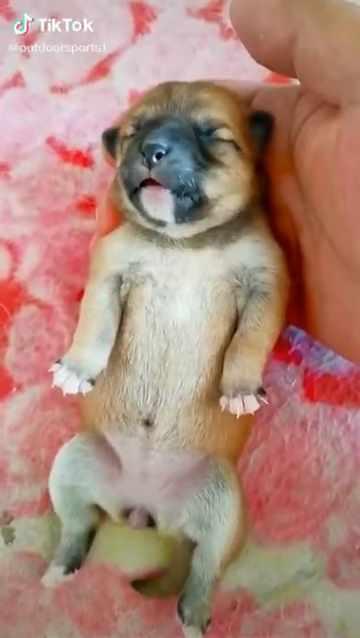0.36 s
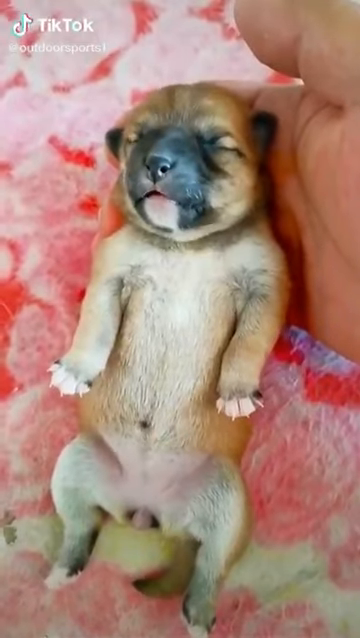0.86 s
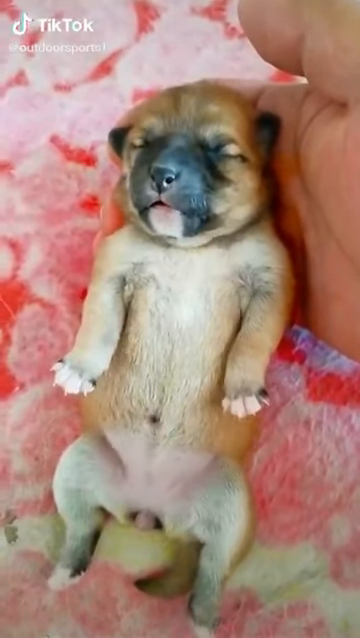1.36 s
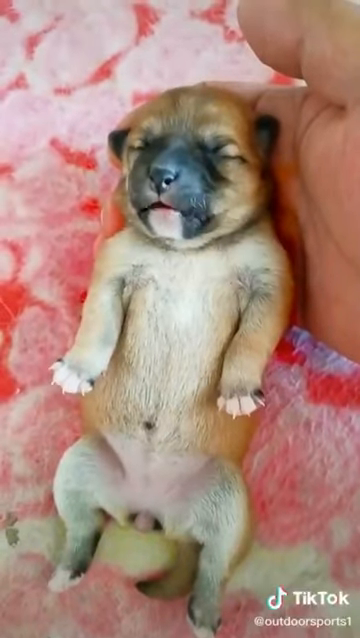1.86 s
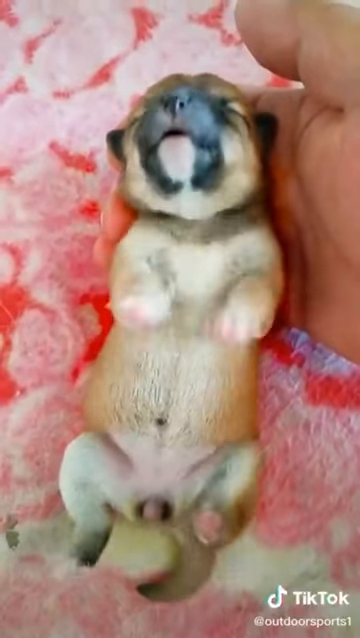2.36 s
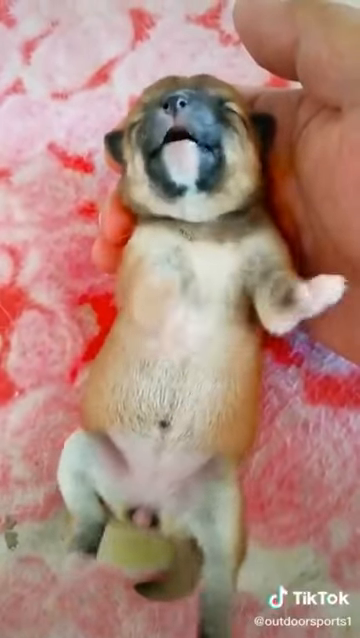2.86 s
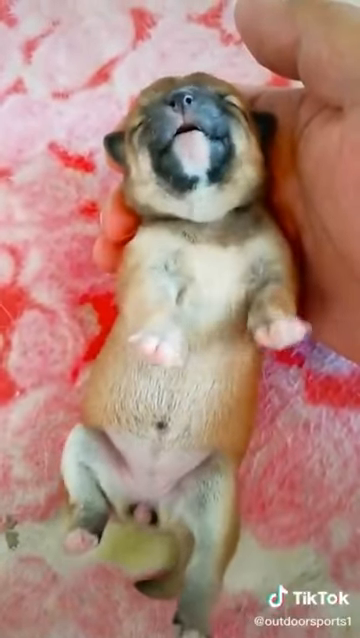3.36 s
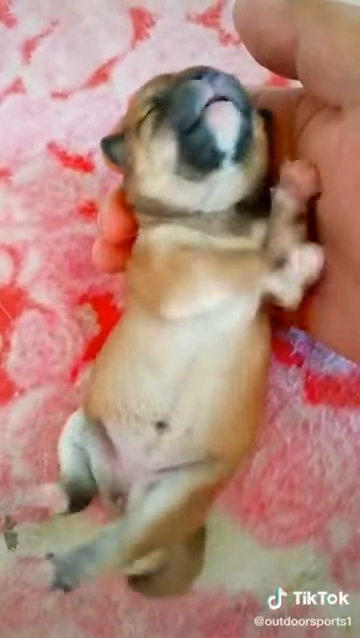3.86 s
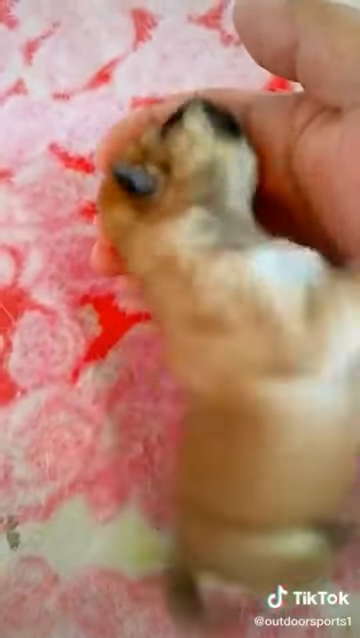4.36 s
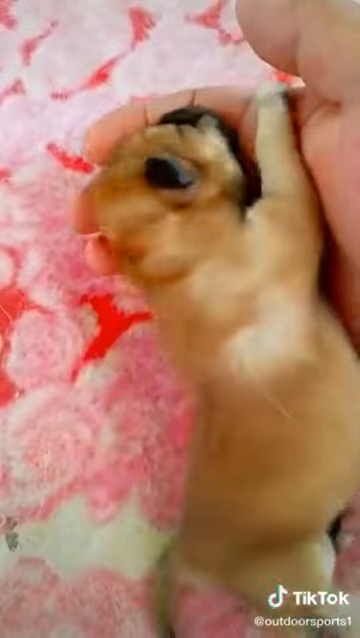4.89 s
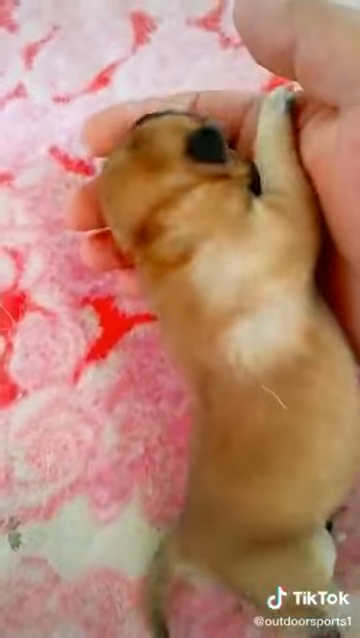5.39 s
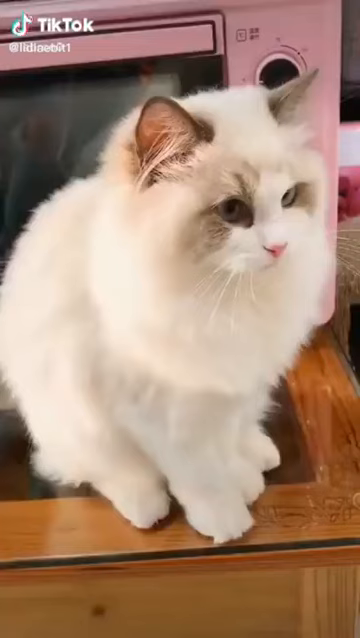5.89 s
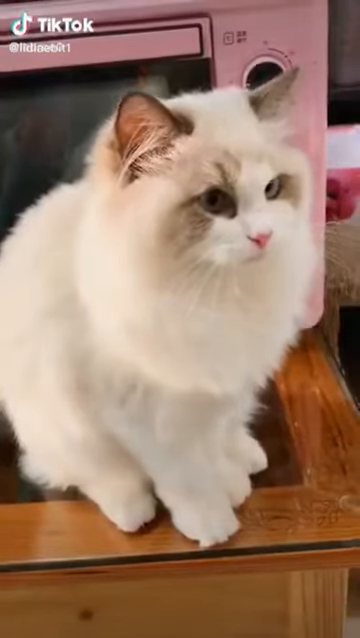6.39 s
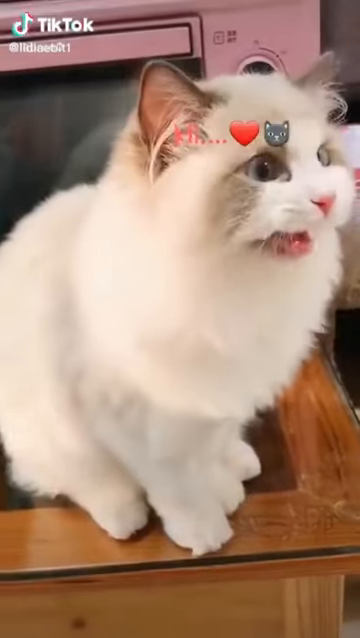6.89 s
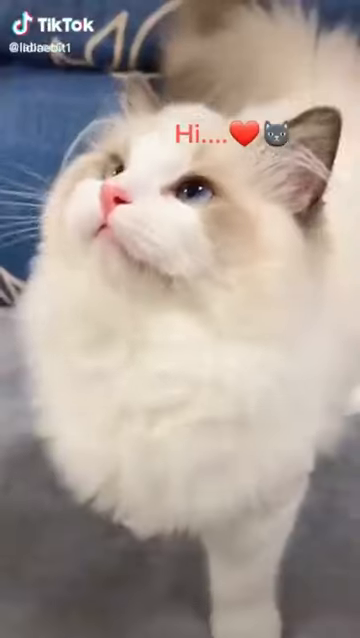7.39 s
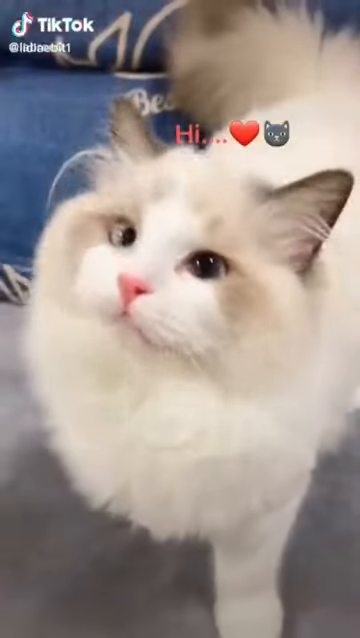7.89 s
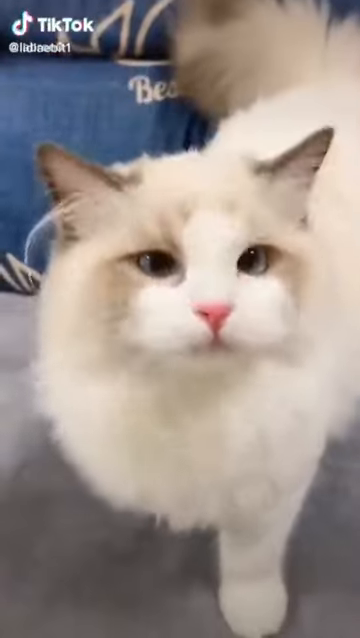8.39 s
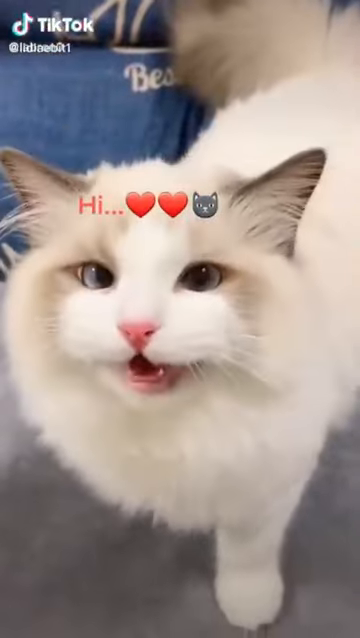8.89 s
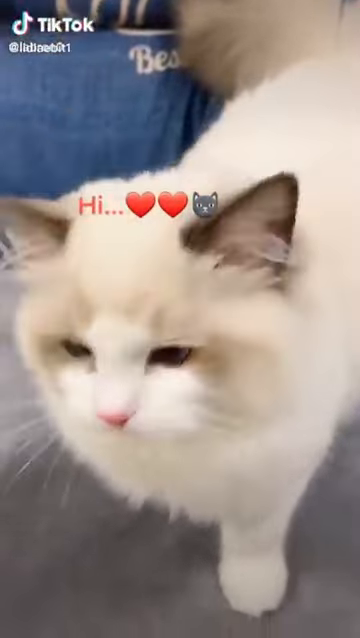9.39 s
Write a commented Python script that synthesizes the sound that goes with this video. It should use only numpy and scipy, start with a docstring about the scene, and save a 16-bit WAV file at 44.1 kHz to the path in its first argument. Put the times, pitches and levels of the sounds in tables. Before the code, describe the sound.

A newborn puppy, close and slightly left in a small, softly echoing bedroom, starts wailing at once: a loud shrill cry leaps upward, cracks, sobs and slides into low creak by 1.0 s, a thin fluttering whistle-like wheeze lingering to 1.3. A wet tick, then the second wail, 1.4-2.5, dips, quavers and climbs to a piercing end. A nasal gasp leads to the third, 2.8-3.8, swooping up then sobbing downward; another gasp, and the fourth, 4.1-4.9, falls similarly. A quieter closed-mouth grumble runs 5.1-5.5. Faint hum, hiss and rustle lie beneath. Complete silence at 5.77-5.91, then low mono room tone. A cat mews softly and thinly at 6.6-7.3, followed by tiny wet ticks and faint throat rattles to 7.8. More rattle at 8.3 precedes a higher, brighter mew at 8.6, roughening and fading into hiss by 9.27. Lip smacks and ticks end it.

```python
"""Newborn puppy, then a cat

A newborn puppy on a blanket wails four times with a quavering voice, then grumbles: harmonics through
throat resonances plus pulsed breath noise, heard from the left at two microphone ports. After a short
silence a cat in another room mews twice in mono: harmonics plus narrow hiss. Noise bursts ringing in
cavities make the throat ticks; decaying sines make the lip smacks; shaped noise makes the room air."""
import sys
import numpy as np
from scipy import signal
from scipy.fft import rfft, irfft, next_fast_len
from scipy.io import wavfile
from scipy.ndimage import map_coordinates

SR = 44100
rng = np.random.default_rng(int(sys.argv[2]) if len(sys.argv) > 2 else 0)


def digitize_waveform(pressure):
    """Quantize a signal to 16-bit integers and store it at the path in sys.argv[1].

    Rows of a 2-D input are taken as channels; values are limited to [-1, 1].
    """
    field = np.atleast_2d(pressure).T
    bounded = np.clip(field, -1, 1)
    quanta = np.round(bounded * 32767).astype(np.int16)
    wavfile.write(sys.argv[1], SR, quanta)


def gain_from_decibels(decibels):
    """Convert decibel values to linear amplitude factors."""
    exponent = np.asarray(decibels, float) / 20
    return 10 ** exponent


N = 418950
T = np.arange(N) / SR


def unit(x):
    """x at rms 1."""
    return x / np.sqrt(np.mean(x ** 2) + 1e-20)


def along(points, hz):
    """(Hz, value) points interpolated on a log frequency axis."""
    f, v = np.transpose(points)
    return np.interp(np.log(hz + 1), np.log(f + 1), v)


def curves(rows, t=T):
    """One value per sample for each column after the time."""
    s, *columns = np.transpose(rows)
    return [np.interp(t, s, column) for column in columns]


def span(rows, fade_s=0.0036):
    """Sample times that a table covers, and a window that softens both ends."""
    t = T[round(rows[0][0] * SR):round(rows[-1][0] * SR)]
    return t, np.clip(np.minimum(t - t[0], t[-1] - t) / fade_s, 0, 1)


def add(track, x, start_s):
    """Mix x into track from start_s."""
    part = track[round(start_s * SR):][:len(x)]
    part += x[:len(part)]


def wobble(rate_hz, size=N):
    """Smooth random curve, rate_hz knots a second."""
    knots = rng.standard_normal(int(size * rate_hz / SR) + 4)
    return map_coordinates(knots, [np.arange(size) * rate_hz / SR])


def filtered(x, response):
    """x times a complex response of frequency."""
    size = x.shape[-1]
    m = next_fast_len(size + 8192)
    return irfft(rfft(x, m) * response(np.fft.rfftfreq(m, 1 / SR)), m)[..., :size]


def noise(spectrum, size=N):
    """Noise of rms 1 coloured by (Hz, dB) points."""
    return unit(filtered(rng.standard_normal(size), lambda hz: gain_from_decibels(along(spectrum, hz))))


def tract(modes, f):
    """Complex response of parallel resonances of alternating sign: (centre Hz, width Hz, dB)."""
    return sum((-1) ** k * gain_from_decibels(db) * 1j * f * width / (centre ** 2 - f * f + 1j * f * width)
               for k, (centre, width, db) in enumerate(modes))


def voice(hz, tilt_db, modes, mouth, jitter, shimmer_db, patchy_db, blur, count, odd=1, treble_db=0,
          edge_hz=3000):
    """Harmonics weighed by the throat at their frequency, each wavering alone; also the phase in cycles."""
    size = len(hz)
    phase = np.cumsum(hz * (1 + jitter * wobble(250, size))) / SR
    grid_hz = np.arange(0, SR / 2)
    response = tract(modes, grid_hz) ** 2 * (grid_hz < 16000)  # two passes, deep valleys
    step = np.exp(2j * np.pi * phase)
    turn, tone, power = 1, 0, 1e-12
    knots = np.arange(size) * 30 / SR
    for k in range(1, count + 1):
        turn = turn * step
        partial_hz = k * hz
        waver_db = patchy_db * np.interp(knots, range(60), rng.standard_normal(60))
        throat = response[np.minimum(partial_hz / mouth, SR / 2 - 1).astype(int)]
        gain = throat * gain_from_decibels(tilt_db * np.log2(k) + waver_db)
        gain = gain * gain_from_decibels((treble_db + waver_db) / (1 + (edge_hz / partial_hz) ** 8))
        # high partials fray into noise
        scatter = np.interp(knots * 12, range(720), rng.standard_normal(720))
        gain = gain * np.exp(1j * blur * scatter * np.minimum(partial_hz / 4600, 1.3) ** 3)
        gain = gain * (odd if k % 2 else 1)
        tone = tone + (gain * turn).real
        power = power + abs(gain) ** 2 / 2
    return gain_from_decibels(shimmer_db * wobble(180, size)) * tone / np.sqrt(power), phase


def ticks(events, width_hz, spread_db):
    """Short puffs of noise ringing in a narrow cavity over a broad splash."""
    out, t = np.zeros(N), T[:SR // 10]
    for start_s, peak_db, ring_hz, length_ms in events:
        window = np.sin(np.pi * np.clip(t / (length_ms / 1000), 0, 1)) ** .5
        puff = rng.standard_normal(len(t)) * window
        ring = filtered(puff, lambda f: tract([(ring_hz, width_hz, 0)], f) + gain_from_decibels(spread_db) * (f > 1500))
        add(out, gain_from_decibels(peak_db) * ring / abs(ring).max(), start_s)
    return out


def pup_cries():
    """Gliding harmonic cries; low pitch turns creaky, each sob lowers pitch and level."""
    # one table per cry, before sobs: (time [s], pitch [Hz], level [dB], source tilt [dB/octave])
    cries = [
        [(.006, 567, -17, -4.5), (.06, 1231, -4, 7.5), (.11, 1633, -7.5, 3), (.13, 1165, -12.5, 8),
         (.185, 925.4, -6, -1), (.235, 910, -8.5, -0.5), (.3, 1309, -11, -7), (.36, 1374, -9, -1.5),
         (.445, 818, -10.5, 0), (.555, 592, -14.5, -1), (.6, 416, -12.5, -1.5), (.7, 307.6, -16.5, -2.5),
         (.82, 165, -20.5, -1.5), (.95, 120.5, -31, -1), (1.026, 99.5, -46.5, 0)],
        [(1.398, 262.3, -32, -9.5), (1.43, 525.4, -13, -3), (1.475, 973, -8, 1.5), (1.505, 1070, -8, 1),
         (1.59, 566.8, -10, 1.8), (1.65, 556, -12, -2), (1.76, 777.6, -8, 1.5), (1.83, 697.5, -9.5, 0),
         (2.08, 964, -6.5, -1.6), (2.13, 1148, -12, -2), (2.295, 1342, -5.5, -8), (2.32, 1643, -3, -17),
         (2.43, 1799, -6, -8.5), (2.47, 1460, -11.5, 3.5), (2.495, 854, -11.5, -5.5), (2.522, 656, -29, 2.5)],
        [(2.79, 300, -25.5, 1), (2.83, 671, -10, 4), (2.86, 1190, -4.5, 11.5), (2.925, 1837, -8, 5.5),
         (2.955, 1268, -15, 5), (3.03, 892, -9, 1.5), (3.12, 1107, -7.5, 1.5), (3.33, 1261, -7.5, -3.5),
         (3.39, 1185, -8, 0), (3.5, 803, -8.5, -3.5), (3.54, 624, -13.5, -2.5), (3.65, 578, -11.5, -2),
         (3.69, 419.4, -11.5, -4), (3.78, 317.8, -21.5, -2), (3.834, 129.4, -35.5, -10)],
        [(4.07, 377, -21.5, -3.5), (4.11, 965, -4, 2.5), (4.15, 1367, -7, 9), (4.195, 1646, -8.5, 2),
         (4.255, 1248, -17.5, 2), (4.315, 1015, -12.5, 0), (4.42, 1059, -8, -3), (4.455, 1186, -11, -2.5),
         (4.51, 1054, -8.5, 0), (4.62, 692, -10, -0.5), (4.71, 557, -11.5, 0.5), (4.82, 401.7, -12, -2),
         (4.866, 300, -31.5, -2.5)],
        [(5.088, 166.3, -27, 3.5), (5.125, 217.8, -19.5, 0.5), (5.17, 314, -19.5, 0), (5.215, 328, -15.5, 1.5),
         (5.3, 284, -18.5, -0.1), (5.36, 300.4, -18.5, -1), (5.44, 281.3, -16.5, -0.5), (5.472, 260, -30, 1)],
    ]
    # extra air per cry: [dB]
    hoarseness_db = [3.5, 4, 0, -3, -5]
    # runs of evenly spaced sobs: (first [s], last [s], sobs [count], strength [share])
    sob_runs = [(.082, .228, 4, .6), (.44, .577, 3, .9), (.668, .855, 4, .8), (1.6, 1.667, 2, .8),
                (1.722, 2.04, 6, .95), (2.1, 2.278, 4, 1.2), (3.095, 3.245, 4, 1.1), (3.3, 3.585, 6, .95),
                (3.662, 3.75, 2, 1), (4.21, 4.41, 5, 1.1), (4.48, 4.6, 3, 1), (4.668, 4.745, 2, .5)]
    # throat resonances before the mouth factor: (centre [Hz], width [Hz], level [dB per pass])
    open_throat = [(300, 160, -9.5), (972, 653, -0.5), (1908, 720, 5), (3616, 1500, -0.45), (5960, 680, -3),
                   (6690, 1740, -9.5), (10980, 3900, -19.5)]
    # same columns, mouth nearly shut
    grumble_throat = [(300, 130, -4), (970, 560, -1.5), (2160, 560, 3), (3397, 820, 2.5), (6560, 3100, -10)]
    break_hz, break_octaves = 570, .5  # where the voice breaks
    calm_semitones, break_semitones = .75, 5.5  # sobs go deepest at the break
    sob_s, sob_db_per_semitone = .027, .3  # full width at half depth

    out = np.zeros(N)
    throats = 4 * [open_throat] + [grumble_throat]
    for rows, throat, hoarse_db in zip(cries, throats, hoarseness_db):
        t, fade = span(rows)
        hz, level_db, tilt_db = curves(rows, t)
        octaves = np.log2(hz / break_hz)
        breaking = np.exp(-(octaves / break_octaves) ** 2)
        sobs = sum(share * np.exp(-np.log(2) * abs(2 * (t - s) / sob_s) ** 1.5)
                   for first, last, n, share in sob_runs for s in np.linspace(first, last, round(n)))
        sag_semitones = sobs * (calm_semitones + break_semitones * breaking)
        hz = hz * 2 ** (-sag_semitones / 12)
        creak = np.clip(170 / hz, 0, 1.5) ** 3
        mouth = 0.93 + 0.027 * octaves  # resonance factor
        tone, phase = voice(hz, tilt_db, throat, mouth, jitter=.0035 + .007 * creak,
                            shimmer_db=1.1 + 1.2 * creak, patchy_db=2.2, blur=1.1, count=36,
                            treble_db=-7 + .5 * tilt_db)  # treble needs a strained voice
        # strained, breaking or creaky voice leaks more air
        breath_db = -24.5 + hoarse_db + 0.72 * tilt_db + 7 * breaking
        breath_db = breath_db + 5.5 * np.clip(creak, 0, 1) ** 0.54
        gusts = rng.standard_normal(len(t)) * (1 + 0.97 * np.cos(2 * np.pi * phase))  # once a cycle
        breath = unit(filtered(
            gusts, lambda f: (tract(throat, f) ** 2 + gain_from_decibels(-33 + hoarse_db)) * f / (f + 3500)))
        level = gain_from_decibels(level_db - sob_db_per_semitone * sag_semitones)
        add(out, fade * level * (tone + gain_from_decibels(breath_db) * breath), t[0])
    return out


def pup_wheeze():
    """Thin wheeze as the first cry runs out of air: two whistles and a faint lower tone, fluttering."""
    # (time [s], pitch [Hz], relative level [dB], upper whistle [Hz], upper over main whistle [dB])
    wheeze_rows = [(.7, 1725, -40, 3085, 7), (.8, 1972, -35, 3186, 3.5), (.946, 1854, -34.5, 3440, -2),
                   (1.04, 2210, -23, 3420, -19.5), (1.182, 2225, -43.5, 3770, -30),
                   (1.25, 2390, -35, 3220, -51), (1.32, 2280, -64, 3030, -16)]
    t, fade = span(wheeze_rows, fade_s=0.043)
    size = len(t)
    hz, level_db, upper_hz, upper_db = curves(wheeze_rows, t)
    phase = 2 * np.pi * np.cumsum(hz * (1 + .025 * wobble(300, size))) / SR
    upper = 2 * np.pi * np.cumsum(upper_hz * (1 + .04 * wobble(300, size))) / SR
    partials = np.sin(phase) + gain_from_decibels(upper_db) * np.sin(upper) + gain_from_decibels(-25) * np.sin(.55 * phase)
    flutter = gain_from_decibels(level_db + 6 + 4 * wobble(70, size))
    out = np.zeros(N)
    add(out, fade * flutter * partials, t[0])
    return out


def pup_inbreaths():
    """Air drawn in between cries: nose-coloured noise that swells briefly, then dies away."""
    # (start [s], end [s], highest level [dB])
    inbreaths = [(2.55, 2.791, -38), (3.828, 4.074, -35), (4.881, 5.093, -49)]
    # (frequency [Hz], relative density [dB per Hz])
    nose_spectrum = [(350, -73.5), (600, -22.5), (765, -6), (1000, -24), (1630, -7), (1960, -5.5),
                     (3650, 6), (15000, -21)]
    out = np.zeros(N)
    for start_s, end_s, db in inbreaths:
        rows = [(start_s, db - 2), (start_s + .07, db), (end_s, db - 22.5)]
        t, fade = span(rows, fade_s=0.025)
        add(out, fade * gain_from_decibels(curves(rows, t)[0]) * noise(nose_spectrum, len(t)), t[0])
    return out


def puppy():
    """Cries, inbreaths and wheeze, with wet ticks of tongue and throat."""
    # (time [s], peak [dB], ring [Hz], length [ms])
    pup_ticks = [(1.3885, -26, 1516, 5.4), (2.5844, -26, 1833, 3.3), (3.8933, -24, 3270, 5),
                 (4.9819, -22, 2270, 5)]
    clicks = ticks(pup_ticks, width_hz=2500, spread_db=-18)
    return clicks + pup_cries() + pup_inbreaths() + pup_wheeze()


def cat_mews():
    """Clean thin harmonics with a narrow hiss through the teeth."""
    # one table per mew: (time [s], pitch [Hz], level [dB], overtones [dB], hiss over voice [dB])
    mews = [
        [(6.595, 736, -44, 17, -22), (6.609, 757, -31.5, 6, -33), (6.651, 832, -35, 7, -32),
         (6.761, 846, -38, -0.5, -28), (6.809, 892, -34.5, -6.5, -34), (6.997, 934.4, -33.5, -14.5, -32.5),
         (7.151, 877, -35, -17.5, -21), (7.177, 972, -40, -13, -18.5), (7.27, 924, -55.5, -9.5, -10.5)],
        [(8.61, 964, -38, -3.5, -27), (8.632, 1104, -32, 7.5, -24), (8.716, 1317, -22.5, 15.5, -29.5),
         (8.768, 1320, -22, 17, -24), (8.876, 1166, -35.5, -1.5, -13.5), (8.988, 1072, -43, -6, -5.5),
         (9.068, 1096, -44, -8, 9.5), (9.13, 1085, -42, -6, -6.5), (9.258, 1038, -42.5, -11, -9),
         (9.27, 1122, -32, -18, -17)],
    ]
    # every other pulse of the second mew weakens, so lines appear halfway:
    # (time [s], halfway lines [share], pitch jitter [share])
    doubling = [(8.645, 0, .003), (8.66, .9, .008), (8.84, .8, .008), (8.855, .5, .05), (8.915, .4, .04),
                (8.93, 0, .003)]
    # throat resonances before the mouth factor: (centre [Hz], width [Hz], level [dB per pass])
    cat_throat = [(1020, 590, 0.5), (2444, 1100, 1.4), (4500, 1100, -1), (7140, 1380, -10),
                  (9000, 1140, -6.5), (12600, 4700, -15.5)]
    # (frequency [Hz], relative density [dB per Hz])
    teeth_spectrum = [(1500, -36), (4000, -20), (6500, -28.5), (8600, 2.5), (10000, -16.5), (15000, -26)]
    out = np.zeros(N)
    for rows in mews:
        t, fade = span(rows)
        size = len(t)
        hz, level_db, overtones_db, hiss_db = curves(rows, t)
        hz = hz * (1 + .006 * wobble(25, size))  # slight waver
        share, jitter = curves(doubling, t)
        # built on half the pitch: odd partials are the halfway lines
        tone, _ = voice(hz / 2, -1, cat_throat, 0.9, jitter, shimmer_db=.8, patchy_db=1.5, blur=.2,
                        count=30, odd=share, treble_db=overtones_db, edge_hz=1480)
        hiss = gain_from_decibels(hiss_db + 1.5 * wobble(40, size)) * noise(teeth_spectrum, size)
        add(out, fade * gain_from_decibels(level_db) * (tone + hiss), t[0])
    return out


def cat_ticks():
    """Wet ticks of tongue and throat, and faint rattles of evenly spaced ticks."""
    # (time [s], peak [dB], ring [Hz], length [ms])
    single_ticks = [(6.491, -43, 3470, 4.2), (6.5984, -22, 3150, 11), (6.7568, -40, 3370, 12),
                    (7.2649, -36.5, 7200, 11), (7.2919, -33, 4600, 4.1), (7.2998, -30, 4350, 20),
                    (9.3257, -23, 3510, 7.8), (9.3526, -30, 4130, 20), (9.3744, -37.5, 3800, 12)]
    # (first [s], last [s], ticks [count], peak [dB])
    rattle_runs = [(7.3794, 7.5601, 6, -44.5), (7.783, 7.826, 2, -53.5), (8.3306, 8.4337, 4, -46),
                   (9.39, 9.4394, 2, -42)]
    ring_hz, length_ms = 4350, 11
    rattle = [(s, db, ring_hz, length_ms)
              for first, last, n, db in rattle_runs for s in np.linspace(first, last, round(n))]
    return ticks(single_ticks + rattle, width_hz=680, spread_db=-14.5)


def lip_smacks():
    """Lips closing: decaying sines with a soft onset."""
    # (time [s], level before onset and decay [dB], ring [Hz], t60 [ms])
    smacks = [(9.272, -32, 1700, 20), (9.287, -36, 1000, 40), (9.305, -35, 1750, 30), (9.327, -17, 580, 25)]
    out, t = np.zeros(N), T[:SR // 10]
    for start_s, db, hz, t60_ms in smacks:
        decay = gain_from_decibels(db - 60 * t / (t60_ms / 1000))
        add(out, decay * np.sin(2 * np.pi * hz * t) * (1 - np.exp(-t / .003)), start_s)
    return out


def cat():
    """Mews, throat ticks and rattles, final lip smacks."""
    return cat_ticks() + cat_mews() + lip_smacks()


def walls(x, channels):
    """Room answer: noise tail whose frequencies each die at their own speed."""
    # (frequency [Hz], t60 [s])
    decay_times = [(300, 0.33), (2000, 0.26), (10000, 0.013)]
    hz, t, z = signal.stft(rng.standard_normal((channels, SR // 2)), SR, nperseg=256)
    decay = gain_from_decibels(-60 * t / along(decay_times, hz)[:, None])
    tail = signal.istft(z * decay, SR, nperseg=256)[1]
    late = np.pad(x, (150, 0))[None]
    return signal.fftconvolve(late, tail / np.linalg.norm(tail[0]), axes=1)[:, :N]


def at_ports(x):
    """Sound from the left: reaches the left port first, and each port colours it differently."""
    # (frequency [Hz], left minus right [dB])
    port_difference = [(60, -4), (150, -9), (380, 10), (940, 5), (2360, -6.5), (5900, 8), (14800, -5.5)]
    left_lead_s = 12 / SR
    side = np.array([[.5], [-.5]])
    return filtered(x, lambda hz: gain_from_decibels(side * along(port_difference, hz))
                    * np.exp(2j * np.pi * hz * side * left_lead_s))


def bedroom_air():
    """Wavering hum common to both ports, hiss partly separate per port, hand rustle on the blanket."""
    # (time [s], relative hum level [dB], relative hiss and rustle level [dB])
    air_levels = [(0.0, -52.5, -72.5), (0.58, -54.5, -51.5), (0.8, -41.5, -50.5), (1.47, -52, -56),
                  (2.45, -57, -62.5), (2.74, -51.5, -55), (2.95, -56.5, -66.5), (3.7, -47.5, -55.5),
                  (3.98, -36, -54), (4.15, -52.5, -62.5), (4.36, -49, -63.5), (5.02, -42, -54.5),
                  (5.58, -38, -56.5), (5.76, -38.5, -56.5)]
    # three spectra: (frequency [Hz], relative density [dB per Hz])
    hum_spectrum = [(15, -43.5), (25, -27), (64, 0), (79, -16.5), (97, -16.5), (130, -25), (170, -54),
                    (290, -120)]
    hiss_spectrum = [(71, -38.5), (120, -12.5), (514, -13.5), (569, -23.5), (642, -12.5), (710, -17.5),
                     (1020, -14.5), (1590, -10.5), (15000, -28.5)]
    rustle_spectrum = [(90, -5), (130, -5), (300, -1.5), (450, -30)]
    hum_db, hiss_db = curves(air_levels)
    hum = gain_from_decibels(hum_db + 4 + 1.4 * wobble(2.8)) * noise(hum_spectrum)
    common = noise(hiss_spectrum)
    separate = np.array([noise(hiss_spectrum), noise(hiss_spectrum)])
    hiss = gain_from_decibels(hiss_db - 4) * (4.3 * common + 7.2 * separate)
    rustle = gain_from_decibels(hiss_db + 6 + 4.5 * wobble(12)) * noise(rustle_spectrum)
    return hum + hiss + rustle


def bedroom():
    """The puppy at two ports, its echo and the room air."""
    pup = puppy()
    return at_ports(pup) + gain_from_decibels(-14) * walls(pup, channels=2) + bedroom_air()


def kitchen_air():
    """Lumpy low room tone: shaped noise with a wavering level."""
    # (time [s], relative level [dB])
    tone_levels = [(5.92, -40.5), (5.96, -41), (6.09, -42.5), (6.78, -40), (7.86, -45.5), (8.07, -45),
                   (9.5, -44)]
    # (frequency [Hz], relative density [dB per Hz])
    tone_spectrum = [(15, -34), (25, -13.5), (66, 0), (159, -12.5), (197, -6.5), (232, -11.5), (272, -14),
                     (886, -20.5), (3670, -43), (6280, -42), (7570, -48), (15200, -50)]
    waver_db = 1.6 * wobble(11) + .8 * wobble(27)
    return gain_from_decibels(curves(tone_levels)[0] + 4.1 + waver_db) * noise(tone_spectrum)


def kitchen():
    """The cat and its echo over the room tone, in mono."""
    cat_sound = cat()
    return cat_sound + gain_from_decibels(-15) * walls(cat_sound, channels=1) + kitchen_air()


def scene():
    """Bedroom, silence, kitchen."""
    silence_start_s, silence_end_s = 5.768, 5.908
    return bedroom() * (T < silence_start_s) + kitchen() * (T > silence_end_s)


def top_cut(x):
    """Nothing passes above the cut-off."""
    return signal.sosfilt(signal.butter(12, 15360, fs=SR, output="sos"), x)


def record(dry):
    """The loudest cries meet a smooth ceiling at 0.98."""
    mix = dry / (1 + abs(dry / .98) ** 9) ** (1 / 9)
    return top_cut(mix)


dry = scene()
out = record(dry)
digitize_waveform(out)
```